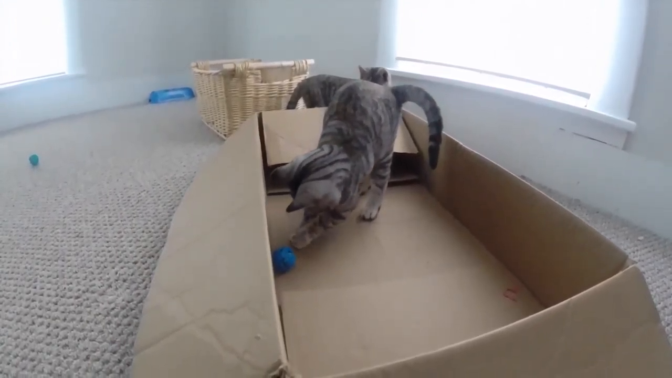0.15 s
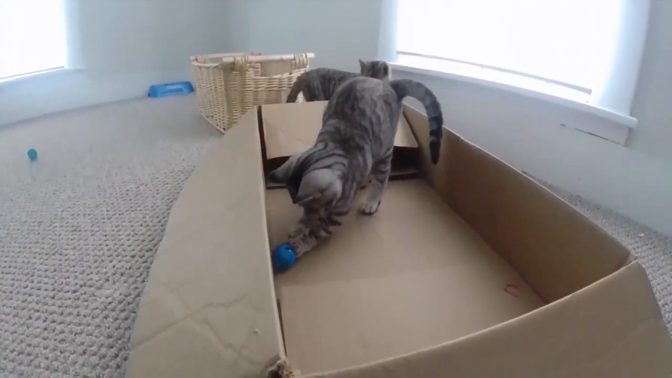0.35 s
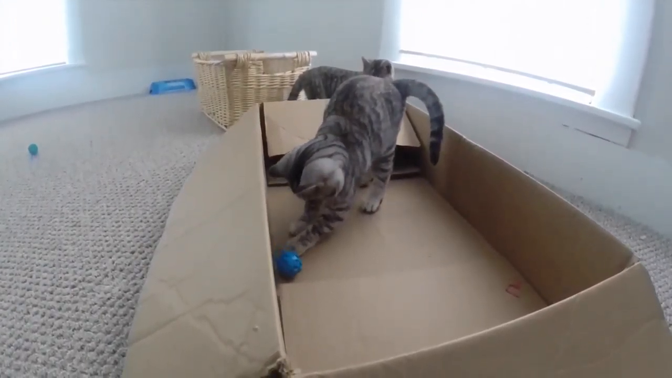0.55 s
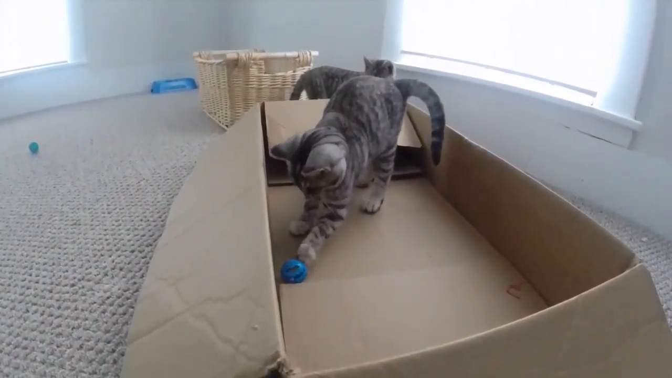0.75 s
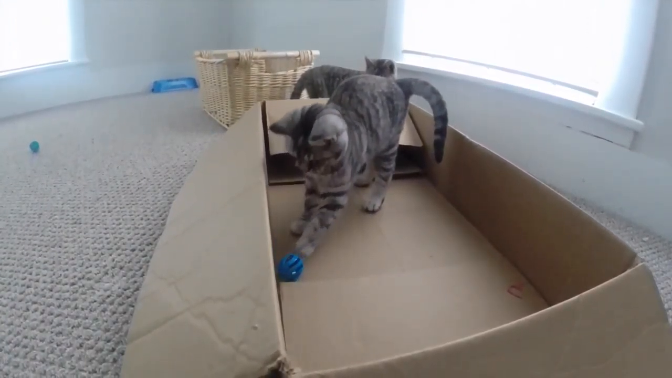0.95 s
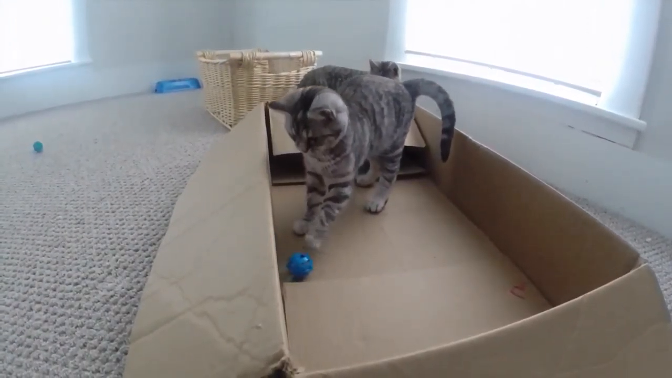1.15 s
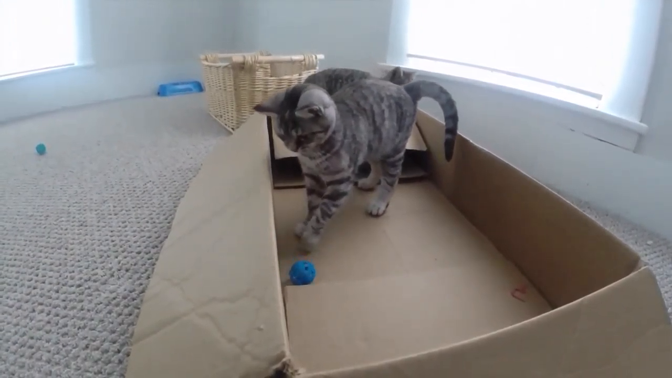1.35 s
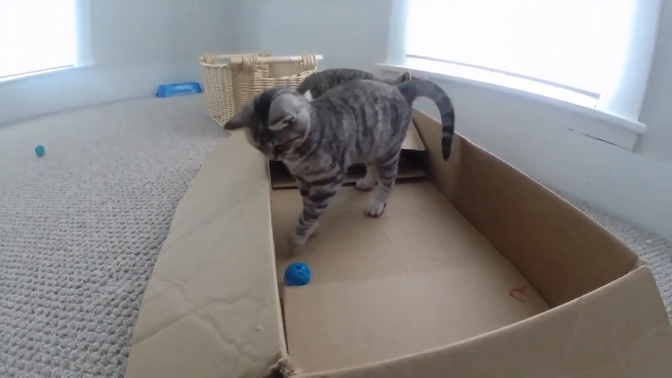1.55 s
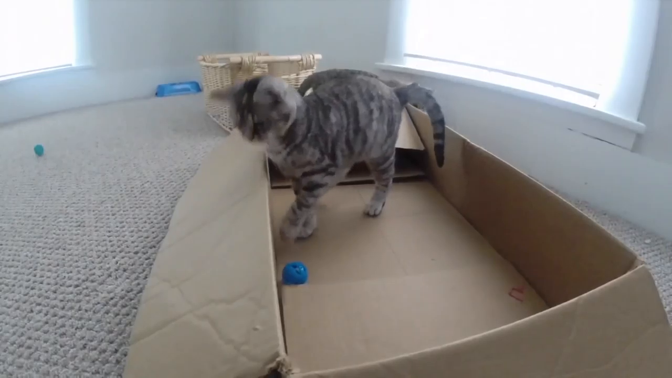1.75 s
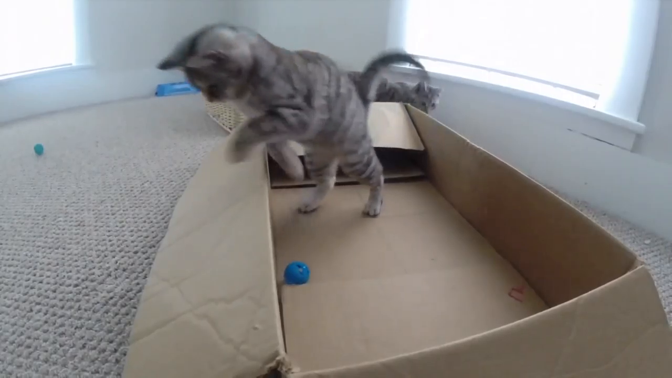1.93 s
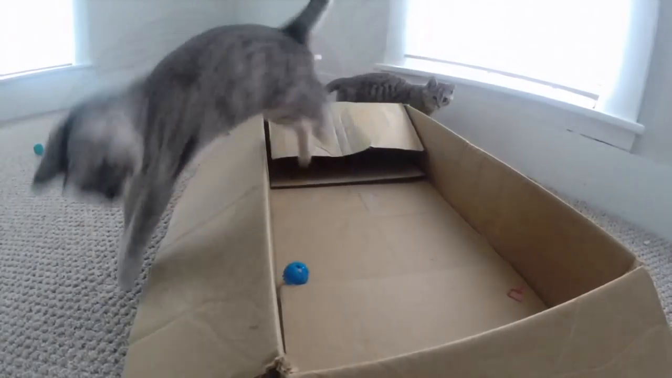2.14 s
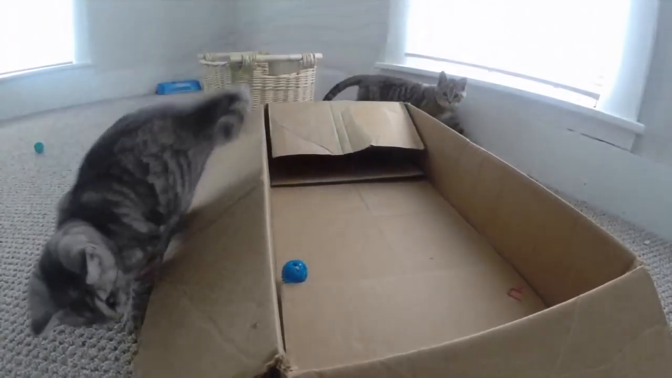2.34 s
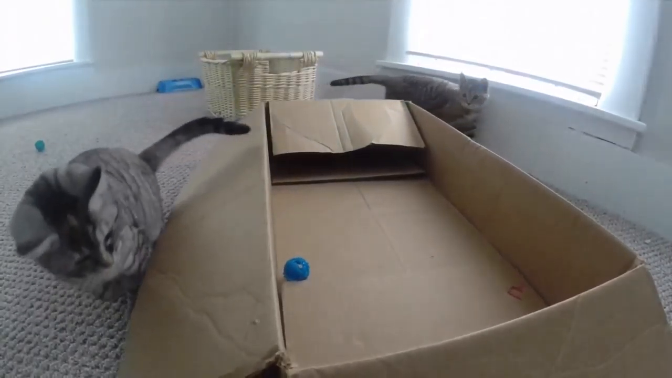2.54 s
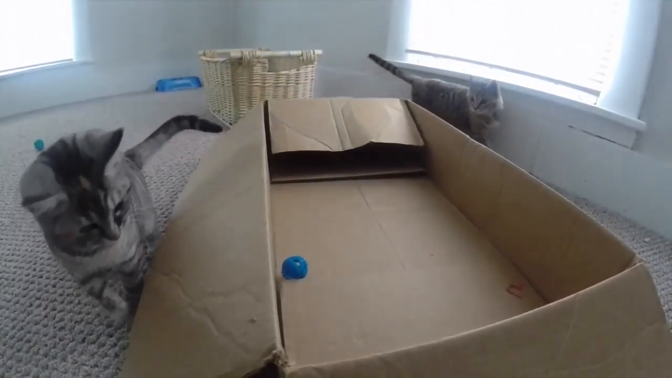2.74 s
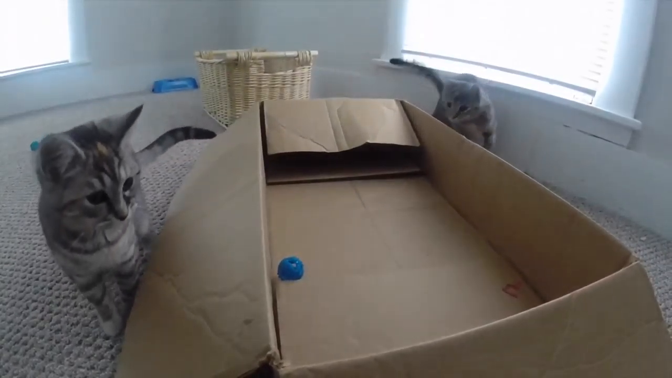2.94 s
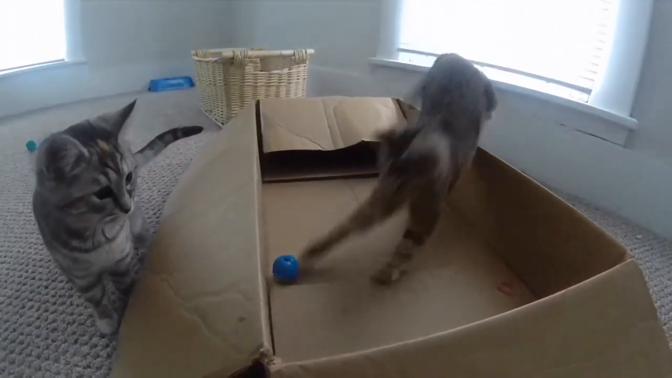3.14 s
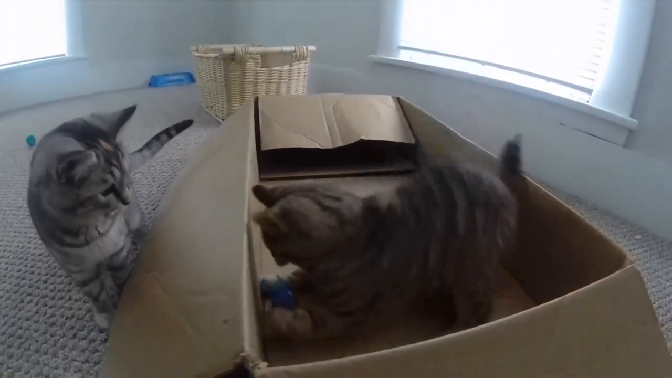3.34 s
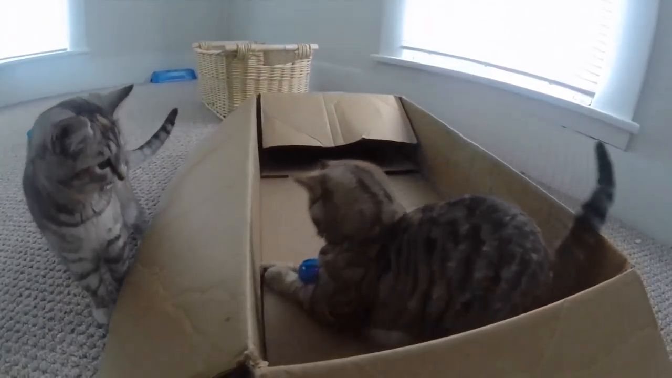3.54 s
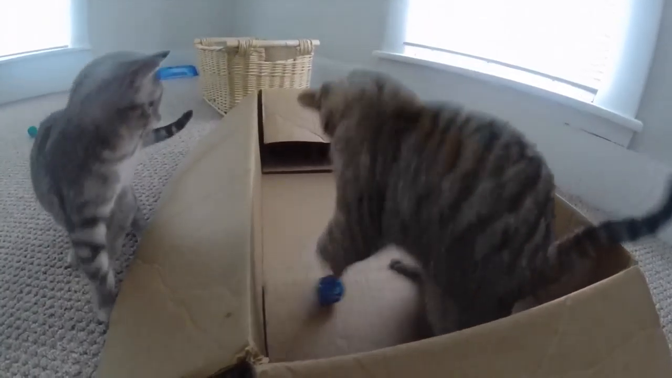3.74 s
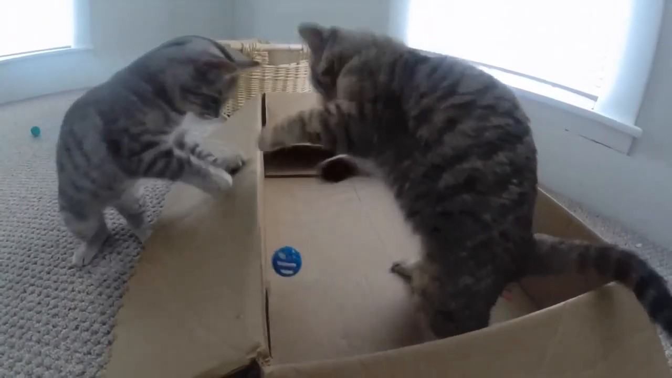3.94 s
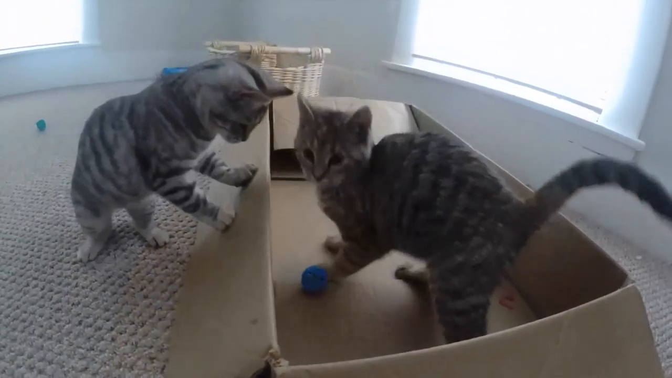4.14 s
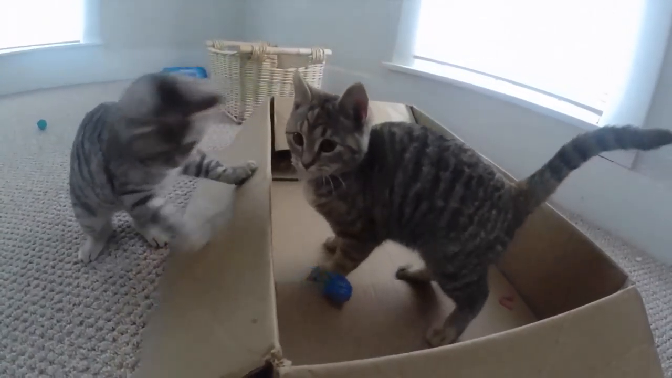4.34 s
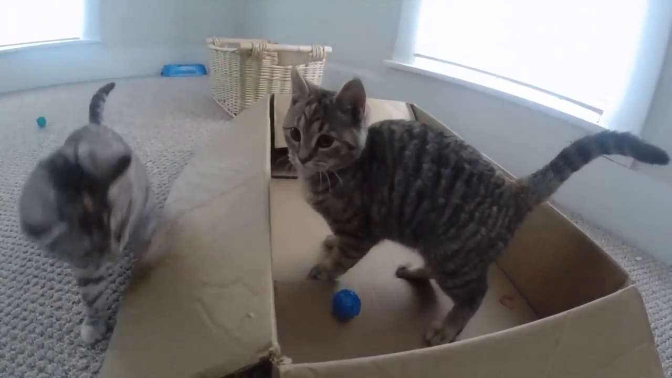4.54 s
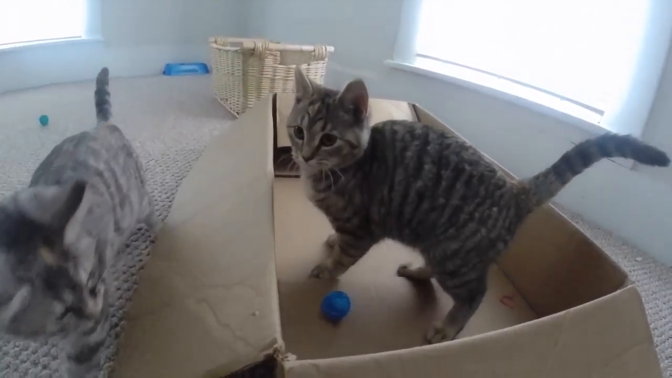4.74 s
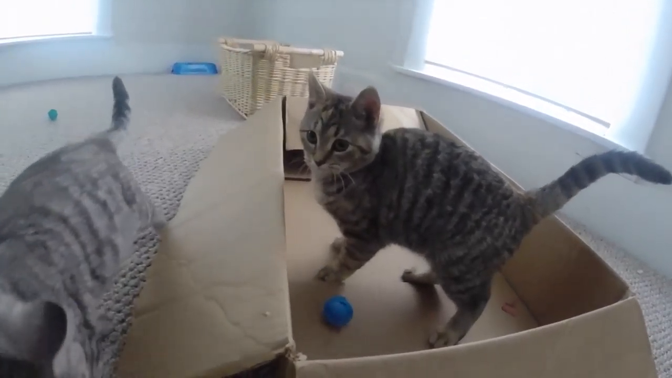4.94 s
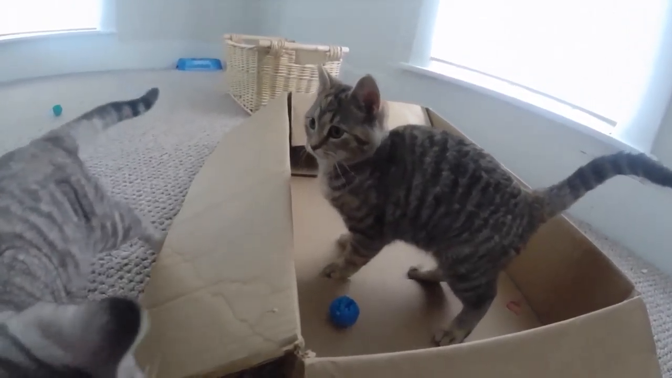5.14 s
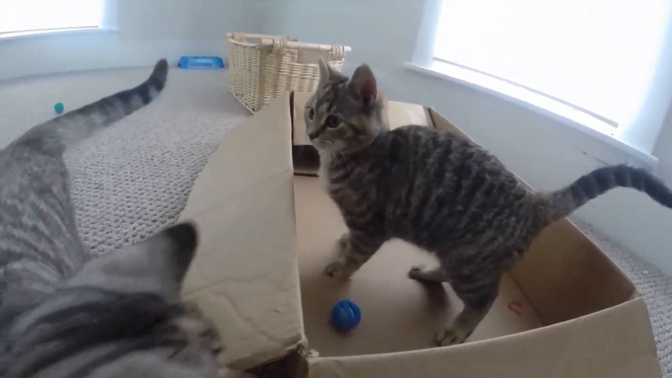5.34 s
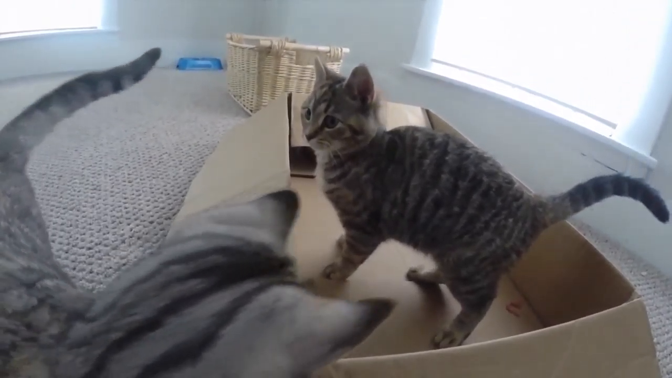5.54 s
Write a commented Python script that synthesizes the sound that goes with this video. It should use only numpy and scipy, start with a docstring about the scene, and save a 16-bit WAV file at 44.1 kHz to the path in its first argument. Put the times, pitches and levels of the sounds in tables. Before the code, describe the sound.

Two kittens play with a small belled plastic ball in a cardboard box. Quiet pats, rubbing and one firmer hollow knock come first; one hops out with soft thumps, the other lands behind, then leaps in with loud booming knocks, claw skids, clicks and jingles. Small taps and rolling end it. Carpeted quiet room, close and slightly dull microphone, low steady hush.

```python
"""A small quiet room, carpet underfoot: two kittens play in a cardboard box with a plastic ball holding a bell.
Paws knock on the panels, one kitten hops out, the other leaps in and skids; claws tick and scrape on the card.
Blows, bell and footfalls are sums of damped modes; ticks and swipes are resonant noise bursts and grains.
Slides and the dragged ball are shaped random grains; a diffuse answer of box and room follows each of them.
A steady hush of shaped noise lies underneath, and the microphone dulls the top."""
import sys
import numpy as np
from scipy import signal
from scipy.fft import rfft, irfft, next_fast_len
from scipy.io import wavfile
from scipy.ndimage import uniform_filter1d, map_coordinates

SR = 44100
rng = np.random.default_rng(int(sys.argv[2]) if len(sys.argv) > 2 else 0)


def dump(signal):
    """Clip the signal to [-1, 1] and save it as 16-bit WAV at the path in sys.argv[1]."""
    limited = np.clip(np.atleast_2d(signal).T, -1, 1)
    pcm = np.round(limited * 32767).astype(np.int16)
    wavfile.write(sys.argv[1], SR, pcm)


N = 250473
T = np.arange(SR // 2) / SR  # time within one event, s


def amp(db):
    """Decibels to gain."""
    return 10 ** (np.asarray(db) / 20)


def unit(x):
    """Scale to rms 1."""
    return x / np.sqrt(np.mean(x ** 2) + 1e-20)


def struck(x):
    """Scale a blow to rms 1 over its first 25 ms."""
    return x / np.sqrt(np.mean(x[:SR // 40] ** 2))


def along(points, hz):
    """Read (f/Hz, value) points at hz on a log frequency axis."""
    f, value = np.transpose(points)
    return np.interp(np.log(hz + 1), np.log(f + 1), value)


def filtered(x, response):
    """Multiply the spectrum of x by a complex response of frequency."""
    size = next_fast_len(len(x) + 8192)
    f = np.fft.rfftfreq(size, 1 / SR)
    return irfft(rfft(x, size) * response(f), size)[:len(x)]


def coloured(x, spectrum):
    """Give x a spectral shape, at rms 1."""
    return unit(filtered(x, lambda f: amp(along(spectrum, f))))


def resonance(x, hz, q):
    """Pass x through one causal resonance, with gain 1 at its pitch."""
    def response(f):
        damping = 1j * f * hz / q
        return damping / (hz * hz - f * f + damping)
    return filtered(x, response)


def add(track, s, x):
    """Mix x into the track from time s."""
    part = track[round(s * SR):][:len(x)]
    part += x[:len(part)]


def grains(size, rate, spread_db):
    """Fibres catch and let go: random tiny clicks of uneven strength, rate per second, at rms 1."""
    caught = rng.random(size) < rate / SR
    strength = rng.standard_normal(size)
    unevenness_db = spread_db * np.clip(rng.standard_normal(size), -2, 2)
    return unit(caught * strength * amp(unevenness_db))


def patchy(x, depth_db):
    """Shifting contact favours ever new narrow bands of the sheet."""
    z = signal.stft(x, nperseg=1024)[2]
    across_bands = uniform_filter1d(rng.standard_normal(z.shape), size=4, axis=0)
    field = uniform_filter1d(across_bands, size=5, axis=1)
    return unit(signal.istft(z * amp(depth_db * unit(field)), nperseg=1024)[1][:len(x)])


def ringing(modes):
    """Damped modes at fresh strengths, detuned by where the blow lands."""
    total = 0
    for hz, level, t60 in modes:
        envelope = amp(level + rng.normal(0, 2.5) - 60 * T / t60)
        total = total + envelope * np.sin(2 * np.pi * hz * rng.normal(1, 0.069) * T)
    return total


# decay of the diffuse answer in box and room: f/Hz, t60/s
ROOM_DECAY = [(80, 0.42), (200, 0.37), (600, 0.19), (2000, 0.45), (6000, 0.28), (14000, 0.22)]


def in_room(x, wet_db):
    """Add a fresh diffuse answer of the box walls and the room, decaying by frequency."""
    hz, t, z = signal.stft(rng.standard_normal(len(T)), SR, nperseg=256)
    decay = amp(-60 * t / along(ROOM_DECAY, hz)[:, None])
    tail = signal.istft(z * decay, SR, nperseg=256)[1][:len(T)]
    tail = tail * (1 - np.exp(-T / 0.0013))  # the answer builds up softly
    answer = signal.fftconvolve(x, tail / np.linalg.norm(tail))[:len(x)]
    return x + amp(wet_db) * answer


# spectral shape of the quiet room: f/Hz, relative level/dB per Hz
HUSH_SPECTRUM = [(12, -28), (20, -6), (65, -2), (86, -9), (107, -6), (204, -9.5), (285, -13.5),
                 (446, -14.5), (624, -17), (698, -19), (923, -19), (2460, -26.5), (2750, -25.5),
                 (13900, -44.5), (16000, -44)]
HUSH_DB = -56  # rms level ahead of the microphone


def hush():
    """The empty room: steady noise, with most of its energy low down."""
    return amp(HUSH_DB) * coloured(rng.standard_normal(N), HUSH_SPECTRUM)


# box panel modes before detuning and filtering: f/Hz, level/dB, t60/s
PANEL_MODES = [(136.6, -5.5, 0.23), (187.6, 3.5, 0.061), (253.8, -2, 0.065), (413, 5.5, 0.019),
               (451, -24, 0.12), (531, 4.5, 0.041), (581, -12.5, 0.12), (676, 0.5, 0.036),
               (1040, -46.5, 0.005), (1562, 3, 0.019)]


def panel(hz):
    """The panels ring around one pitch; a soft paw excites no highs and thin card radiates little bass."""
    contact = signal.butter(2, np.clip(3 * hz, 100, 9000), fs=SR)
    baffle = signal.butter(3, 125, "high", fs=SR)
    ring = resonance(ringing(PANEL_MODES), hz, q=1.26)
    ring = signal.lfilter(*contact, signal.lfilter(*baffle, ring))
    return struck(in_room(ring, wet_db=-2.5))


# paws and ball hitting the box: t/s, nominal peak level/dB, panel pitch f/Hz, crack level re that peak/dB
PANEL_BLOWS = [(.296, -37, 296, -17.5), (.494, -32.5, 225, -6), (.565, -37.5, 260, -15),
               (0.714, -37, 457, -23), (.801, -31, 463, -13), (0.8854, -13, 514, -13),
               (1.486, -43.5, 304, -11), (1.884, -38.5, 520, -8), (2.266, -26, 228, -20),
               (2.409, -41.5, 500, -14), (2.421, -21.5, 150, -30), (2.442, -26.5, 134, -34),
               (3.215, -8, 157, -33), (3.244, -6, 370, -9.5), (3.306, -16, 425, -13),
               (3.356, -12, 385, -28), (3.408, -2.5, 510, -14.5), (3.767, -24, 310, -4),
               (3.851, -34, 298, 3.5), (3.956, -2, 410, -13), (4.084, -17, 690, -6.5),
               (4.149, -17, 352.5, -21), (4.256, -33.5, 505, -4), (4.37, -35.5, 460, -14),
               (4.482, -39, 484, -10), (4.624, -40, 514, -4), (4.701, -39.5, 302, -6)]
# spectral shape of the cracking card skin: f/Hz, relative level/dB per Hz
CRACK_SPECTRUM = [(500, -9), (900, 9), (1500, 4), (2000, 1.5), (2800, 0.5), (4000, -9.5), (7000, -34),
                  (15000, -32)]
# after a blow the whole panel flexes: delay (s), pitch over the blow's, nominal level re blow (dB), pitch floor
FLEX_S, FLEX_RATIO, FLEX_DB, LOWEST_HZ = 0.00402, 0.55, -6, 128


def knocks():
    """Each blow cracks the card's skin and rings it at its own pitch; then the whole panel flexes."""
    out = np.zeros(N)
    for s, db, hz, crack_db in PANEL_BLOWS:
        crack = coloured(rng.standard_normal(len(T)), CRACK_SPECTRUM) * amp(-60 * T / 0.01)
        crack = struck(in_room(crack, wet_db=-4.5))
        add(out, s, amp(db - 11.5) * panel(hz) + amp(db + crack_db - 11.0) * crack)
        flex = panel(max(FLEX_RATIO * hz, LOWEST_HZ))
        add(out, s + FLEX_S, amp(db + FLEX_DB - 12.5) * flex)
    return out


STROKE_ATTACK_S, STROKE_RELEASE_DB_PER_S = 0.014, 168


def stroke(start, hold):
    """Gain of one slide: it starts quickly, holds, and dies away as the kitten brakes."""
    t = np.arange(N) / SR - start
    release_db = -STROKE_RELEASE_DB_PER_S * np.maximum(t - hold, 0)
    return np.clip(t / STROKE_ATTACK_S, 0, 1) * amp(release_db)


# spectral shape of the grainy hiss in every slide: f/Hz, relative level/dB per Hz
HISS_SPECTRUM = [(1500, -31.5), (3000, -7.5), (4500, 5), (7000, 1), (10000, -9), (13000, -12), (15500, -28)]


def sliding(rows, spectrum):
    """Pads, claws and ball move in uneven jerks: the panel rumbles under a grainy hiss."""
    gains = []
    for start, hold, rub_db, hiss_db in rows:
        gains.append(amp([[rub_db], [hiss_db]]) * stroke(start, hold))
    rub_gain, hiss_gain = np.max(gains, axis=0)
    # a random curve with a new point every 800 samples
    jerk = map_coordinates(rng.standard_normal(N // 800 + 4), [np.arange(N) / 800])
    rub = coloured(patchy(grains(N, rate=1800, spread_db=2.5), depth_db=3.5), spectrum)
    hiss = coloured(patchy(grains(N, rate=3000, spread_db=4), depth_db=2.0), HISS_SPECTRUM)
    friction = rub_gain * rub + hiss_gain * hiss
    return in_room(friction * amp(2.47 * jerk - 3), wet_db=-7.5)


# the ball pushed about by a paw: start t/s, hold t/s, rub level/dB, hiss level/dB (before the jerks)
PAW_STROKES = [(.31, 0.19, -46, -78), (.46, 0.034, -37, -62), (.55, 0.2, -56, -76), (.81, 0.11, -44, -64.5),
               (4.36, .34, -51, -66.5), (4.85, 0.26, -58, -74)]
# spectral shape of the ball pawed over the box floor: f/Hz, relative level/dB per Hz
ROLL_SPECTRUM = [(50, -31), (100, 0), (165, 12.5), (230, 3), (320, 0), (550, -1.5), (900, -8.5),
                 (1500, -9.5), (2500, -22), (4000, -28), (7000, -37)]


def pawing():
    """A paw pushes the ball over the box floor, a low jerky rub with a little hiss."""
    return sliding(PAW_STROKES, ROLL_SPECTRUM)


# bell modes, three groups, decay while ringing freely: f/Hz, level/dB, t60/s
MAIN_MODE = [(4877, 0, .7)]
LOW_PAIR = [(4370, 0, .7), (4478, -3, .7)]
HIGH_MODES = [(9458, -5, .45), (9750, -11, .3), (9865, -5, .4), (10555, 0, .6)]
# the bell rings freely this long, then the pellet lies on the shell and damps it
FREE_S, SETTLE_DB_PER_S = 0.018, 288.5
MIX_SCATTER_DB = 3  # each mode changes from strike to strike


def jingle(main_db, low_db, high_db):
    """One strike of the pellet wakes a fresh mix of modes; they ring freely until it settles on the shell."""
    ring = np.zeros(len(T))
    for modes, db in ((MAIN_MODE, main_db), (LOW_PAIR, low_db), (HIGH_MODES, high_db)):
        for hz, level, t60 in modes:
            envelope = amp(db + level + rng.normal(0, MIX_SCATTER_DB) - 60 * T / t60)
            ring += envelope * np.sin(2 * np.pi * (hz + rng.normal(0, 1.0)) * T)
    damping = amp(-SETTLE_DB_PER_S * np.maximum(T - FREE_S, 0))
    onset = 1 - np.exp(-T / 0.00053)
    return in_room(ring * damping * onset, wet_db=-4.0)


# the ball jostled, its bell shaken: start t/s, length t/s, main mode level/dB, low pair level/dB, high level/dB
BELL_SHAKES = [(.312, .06, -69, -82, -81), (.378, .02, -49, -80, -82), (.506, .07, -60, -62.5, -73),
               (.803, .06, -59, -73, -76), (.928, .02, -64, -66, -76), (.958, .02, -69, -69, -60.5),
               (1.19, .02, -73, -83, -90), (3.252, .02, -42, -43, -43.5), (3.425, .12, -48, -64, -52),
               (3.58, .16, -59, -70, -65), (3.796, .02, -50, -58, -55), (3.871, .1, -37, -48, -50),
               (4.094, .02, -35, -47, -51), (4.154, .02, -44, -51, -60), (4.213, .06, -51, -51.5, -52.5),
               (4.407, .02, -57, -59, -59.5), (4.572, .14, -55.5, -66, -69.5),
               (4.945, .07, -60.5, -73, -88), (5.074, .02, -71, -75, -63)]
PELLET_GAP_S, PELLET_SCATTER = .042, .25  # time between strikes, and its unevenness (share of the gap)
SHAKE_FADE_DB_PER_S = 20  # strikes weaken in a shake


def bell():
    """While the ball is jostled the pellet strikes again and again, unevenly and on average more weakly."""
    out = np.zeros(N)
    for start, length, *mix_db in BELL_SHAKES:
        for t in np.arange(0, length, PELLET_GAP_S):
            late = (t > 0) * PELLET_GAP_S * PELLET_SCATTER * rng.standard_normal()
            add(out, start + t + late, amp(-SHAKE_FADE_DB_PER_S * t) * jingle(*mix_db))
    return out


# short paw swipes: middle t/s, nominal level/dB, pitch f/Hz, half length t/s (to 1/e)
PAW_SWIPES = [(0.362, -54, 2480, .01), (.495, -47.5, 2000, 0.022), (1.004, -50, 2230, 0.0034),
              (1.891, -60, 4450, 0.018), (1.972, -58.5, 2200, 0.0093), (2.135, -65, 5830, 0.033),
              (2.276, -58.5, 7260, .012), (2.42, -61.5, 6550, 0.021), (4.288, -38, 1800, 0.011),
              (4.293, -47.5, 2900, .016), (4.361, -55.5, 4460, 0.032), (4.493, -45.5, 1820, 0.0103),
              (4.517, -60, 8200, 0.014), (4.961, -61, 1210, 0.026)]
SWIPE_Q, SWIPE_Q_HZ = 5.7, 2000  # sharpness at this pitch; higher swipes (fur) are broader than lower (claws)


def swipes():
    """A paw brushes the card: a brief swell of grains, broad for fur, narrow where a claw rasps."""
    out = np.zeros(N)
    middle = T[-1] / 2
    for s, db, hz, half in PAW_SWIPES:
        fibres = grains(len(T), rate=3100, spread_db=-2.0)
        brush = unit(resonance(fibres, hz, SWIPE_Q * SWIPE_Q_HZ / hz))
        swell = np.exp(-((T - middle) / half) ** 2)
        add(out, s - middle, amp(db) * in_room(brush * swell, wet_db=-9.0))
    return out


def snaps(rows):
    """A sharp contact on the card: noise dying within milliseconds through two broad resonances."""
    out = np.zeros(N)
    for s, db, hz in rows:
        snap = rng.standard_normal(len(T)) * amp(-60 * T / .006)
        snap = resonance(resonance(snap, hz, q=0.81), hz, q=0.95)
        add(out, s, amp(db - 23) * struck(in_room(snap, wet_db=-9)))
    return out


# the sharpest clicks of claws and plastic: t/s, nominal peak level/dB, pitch f/Hz
SHARP_CLICKS = [(.377, -44, 7000), (.528, -39.5, 5500), (3.243, -18, 3250), (3.391, -35, 7030),
                (3.496, -24.5, 9300), (3.794, -16.5, 5000), (3.956, -18, 4000), (4.0841, -8, 3230),
                (4.412, -34, 2890), (4.484, -39, 2500), (4.57, -35.5, 4670), (4.624, -39, 3500),
                (4.701, -44.5, 2900), (5.034, -43.5, 4940)]


def ticks():
    """A claw or the ball's shell snaps against the card."""
    return snaps(SHARP_CLICKS)


# a kitten's weight coming down on the floor: t/s, nominal peak level/dB
WEIGHT_DROPS = [(2.265, -42), (2.302, -33), (2.415, -29.5), (3.211, -24), (3.357, -22), (4.155, -20.5),
                (4.256, -34.5)]


def thuds():
    """A kitten's weight gives the floor one low push, a short decaying sine of random pitch."""
    out = np.zeros(N)
    for s, db in WEIGHT_DROPS:
        tone = np.sin(2 * np.pi * rng.uniform(44, 128) * T)
        push = tone * amp(-60 * T / 0.043) * (1 - np.exp(-T / 0.0021))
        add(out, s, amp(db - 10.5) * in_room(struck(push), wet_db=0.0))
    return out


# the far kitten landing on the floor behind the box: t/s, nominal peak level/dB
LANDINGS = [(2.935, -21.5), (2.961, -32)]
# floor modes before detuning: f/Hz, level/dB, t60/s
FLOOR_MODES = [(284, -3, 0.03), (323, 21, 0.021), (408, -18, 0.019), (616, -9, 0.068)]


def footfalls():
    """Soft pads give the floor a short hollow thump."""
    out = np.zeros(N)
    for s, db in LANDINGS:
        thump = ringing(FLOOR_MODES) * (1 - np.exp(-T / 0.0018))
        add(out, s, amp(db - 15.5) * struck(in_room(thump, wet_db=-6.0)))
    return out


# a kitten skidding on the card: start t/s, hold t/s, rub level/dB, hiss level/dB (before the jerks)
SKID_STROKES = [(3.203, 0.15, -31, -43.5), (3.358, 0.12, -32, -44.5), (3.56, 0.41, -41.5, -59.5),
                (3.854, .2, -40, -44), (4.09, 0.026, -29.5, -44), (4.175, 0.12, -45, -53)]
# spectral shape of the skid's rub: f/Hz, relative level/dB per Hz
RUB_SPECTRUM = [(50, -25), (100, 6), (180, 3.5), (310, 6), (500, 7.5), (850, 1), (1500, -0.5), (2100, -9.5),
                (4000, -14), (7000, -21)]
# claws catch at random in a skid: rate, nominal peak re hiss, its scatter, typical pitch
CATCH_PER_S, CATCH_DB, CATCH_SCATTER_DB, CATCH_HZ = 14, 15, 3, 6000


def skid():
    """Pads and claws skid over the card, a jerky rub under a grainy hiss."""
    return sliding(SKID_STROKES, RUB_SPECTRUM)


def claw_catches():
    """Smaller catches of the claws pepper the skids, at random times and pitches."""
    catches = []
    for start, hold, _, hiss_db in SKID_STROKES:
        for _ in range(round(hold * CATCH_PER_S)):
            s = start + hold * rng.random()
            db = hiss_db + CATCH_DB + rng.normal(0, CATCH_SCATTER_DB)
            catches.append((s, db, CATCH_HZ * rng.lognormal(0, 0.27)))
    return snaps(catches)


# the ball dragged along the card under a paw: t/s, level/dB (before the room answers)
DRAG_LEVEL = [(3.548, -54.5), (3.585, -44), (3.66, -57), (3.75, -53), (3.82, -53.5), (3.93, -48),
              (3.97, -61)]
# what the drag sings in: f/Hz, q, level/dB
DRAG_RESONANCES = [(490, 10, 5), (630, 7, 3), (1050, 4, -8), (2030, 8, 0), (3800, 14, -9)]


def drag():
    """The ball sticks and slips along the card, humming in a few resonances."""
    s, db = np.transpose(DRAG_LEVEL)
    slips = grains(N, rate=790, spread_db=-1)
    hum = unit(sum(amp(level) * resonance(slips, hz, q) for hz, q, level in DRAG_RESONANCES))
    level_db = np.interp(np.arange(N) / SR, s, db, left=-120, right=-120)
    return in_room(hum * amp(level_db), wet_db=5.5)


def scene():
    """The play over the steady hush of the room."""
    blows = knocks() + thuds() + footfalls()
    friction = pawing() + swipes() + skid() + drag()
    clicks = ticks() + claw_catches()
    return (hush() + blows + friction + clicks + bell())[None]


TOP_HZ = 15400  # band limit


def record(dry):
    """The microphone dulls the top octave and nothing passes the band limit."""
    mic = [(11000, -1), (13000, -5.0), (15000, -8)]  # f/Hz, level/dB
    return np.array([filtered(x, lambda hz: amp(along(mic, hz)) * (hz < TOP_HZ)) for x in dry])


dry = scene()
out = record(dry)
dump(out)
```